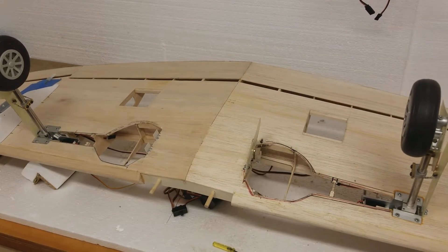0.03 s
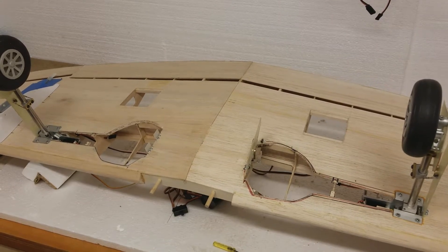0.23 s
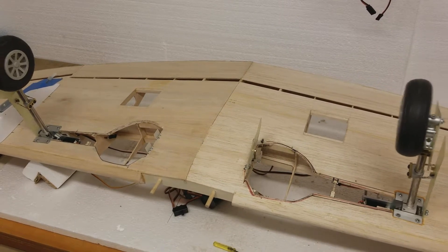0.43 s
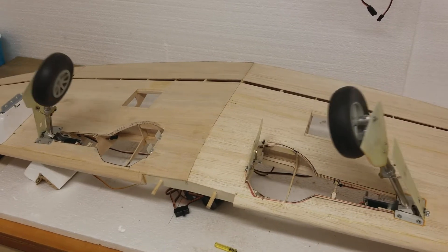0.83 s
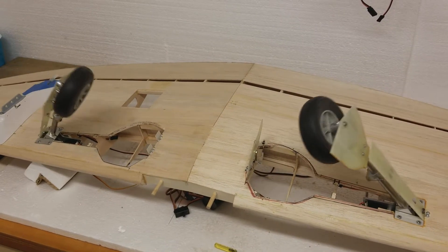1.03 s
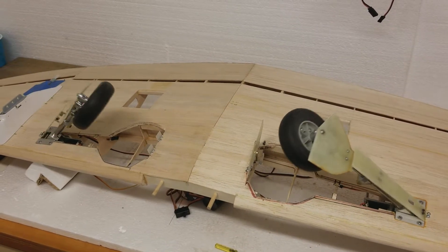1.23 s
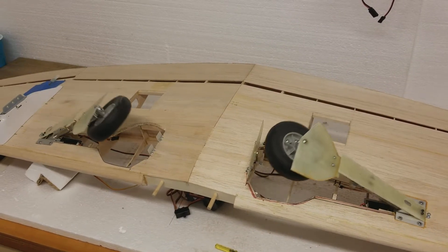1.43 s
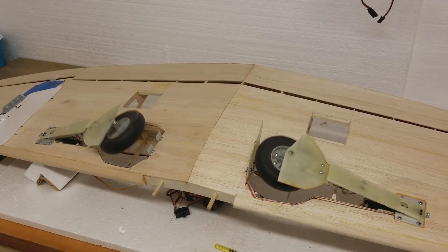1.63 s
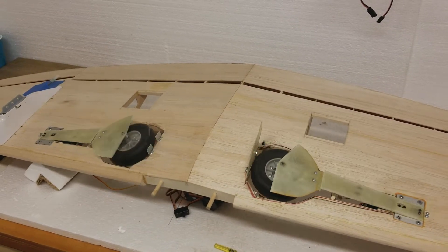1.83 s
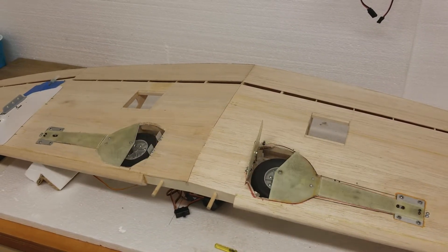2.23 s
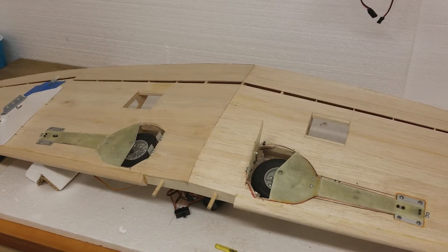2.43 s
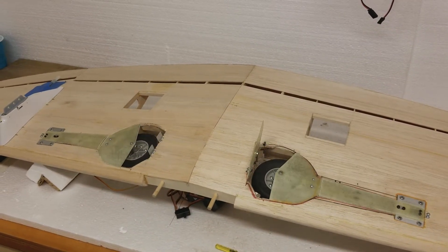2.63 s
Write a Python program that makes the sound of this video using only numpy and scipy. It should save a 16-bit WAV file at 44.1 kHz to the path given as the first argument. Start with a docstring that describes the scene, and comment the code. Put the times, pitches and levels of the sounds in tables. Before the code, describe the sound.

Small electric motors whir and grind, folding model landing gear, then rattle and stop.

```python
"""Two small geared motors fold the landing gear into a balsa model wing on a workbench.
After a click they spin up, with grinding teeth and hissing brushes, and wobble once per turn of their
lead screws (the threaded rods that move the legs). The wing rumbles as the legs tip over. The motors
labour as the wheels seat, rattle free and cut out. The idle electronics whine faintly throughout,
and the room adds a short echo."""
import sys
import numpy as np
from scipy import signal
from scipy.fft import rfft, irfft, next_fast_len
from scipy.io import wavfile

SR = 44100
rng = np.random.default_rng(int(sys.argv[2]) if len(sys.argv) > 2 else 0)


def file_out(sig):
    """Save sig as 16-bit WAV at sys.argv[1]."""
    # one column per channel
    cols = np.atleast_2d(sig).T
    # limit, then scale
    lim = np.clip(cols, -1, 1)
    pcm = np.round(lim * 32767).astype(np.int16)
    wavfile.write(sys.argv[1], SR, pcm)


N = 123479
T = np.arange(N) / SR

# tones of the idle electronics: pitch_multiple, level_db
WHINE_TONES = [(1, -70), (2, -61), (3, -47.5), (4, -58.5), (5, -60), (7, -63), (9, -62), (10, -60),
               (11, -62.5), (19, -69.5)]
# tone colour of the background noise and of the click: frequency_hz, level_db
BACKGROUND_COLOUR = [(25, -5), (100, -5), (300, -17.5), (600, -22), (1500, -13), (3500, -22), (6000, -18.5),
                     (9000, -21.5), (13000, -33)]
CLICK_COLOUR = [(300, -23), (650, -10), (870, 10.5), (1200, -5), (2500, -10.5), (4000, -13), (6000, -16),
                (8500, -28), (12000, -19), (16000, -41)]
# how each motor runs: time_s, speed_hz (turns a second), dip_hz (slowing as the screw binds), level_db
MOTOR_A_RUN = [(.15, 258, 0.5, 2), (.215, 375, -1, -3), (.45, 388, 2.5, 1.5), (.78, 363, 4, -1),
               (1.0, 350, 10, 1.5), (1.2, 332, 20, 1), (1.4, 320, 24, 0), (1.5, 309, 20, 0),
               (1.8, 303, 22.5, 0.5), (1.93, 320, 4.5, -1), (2.0, 330, 4, -3), (2.12, 378, 0.5, -4),
               (2.18, 290, -1.5, 1.5), (2.25, 236, 0, -3), (2.285, 223, -0.5, 0.5), (2.32, 246, -0.5, -2),
               (2.362, 210, 1, -3), (2.38, 245, 0.5, -18), (2.425, 233, 1, -9.5), (2.5, 250, 1, -15)]
MOTOR_B_RUN = [(.15, 262.7, -1.5, -13), (.22, 365.2, 0, 0), (.35, 370.4, 5.5, -0.5), (.45, 385.4, -2, 2),
               (.72, 366.8, 5, -0.5), (.88, 360.6, 18, -2), (.96, 356.9, 12, 2), (1.2, 340.2, 15.5, -4.5),
               (1.32, 339.6, 19.5, -2), (1.82, 338, 17, -4.5), (1.92, 382.9, -1.5, -3),
               (1.97, 382.3, 3.5, -6), (2.035, 344.2, -2, 0), (2.125, 377.1, -0.5, 3),
               (2.18, 335.4, 0, -3.5), (2.21, 265.9, 0, 2), (2.3, 244.4, -3, -3), (2.36, 260, 0, 2.5),
               (2.385, 310, -2, -10.5), (2.49, 347.5, -1, -5)]
# motor tones, A rich in meshing teeth, B mostly the tug of its three magnetic poles:
# speed_multiple, free_level_db, loaded_level_db
MOTOR_A_TONES = [(1, -32.5, -40.5), (3, -25.5, -37.5), (4, -37.5, -45), (5, -35, -49), (6, -28, -27),
                 (7, -32, -45), (8, -42.5, -34), (9, -34.5, -22), (10, -44, -54), (12, -64, -32),
                 (20, -45.5, -50), (33, -44, -52), (42, -58, -39), (60, -62, -45)]
MOTOR_B_TONES = [(1, -29.5, -43.5), (2, -44, -40), (3, -20, -36.5), (5, -32, -44.5), (6, -32.5, -20),
                 (7, -35, -48), (9, -35.5, -28)]
# speeds at which a motor sounds fully loaded and fully free: loaded_hz, free_hz
LOADED_AND_FREE_HZ = [240, 380]
# how well the wing gives off each motor tone: frequency_hz, gain_db
WING_RESPONSE = [(800, -1.5), (960, 3.5), (1040, 5.5), (1100, 0), (1160, -5), (1380, 5), (1510, 4),
                 (1650, 3), (1950, 0), (2090, 3), (2700, 1.5), (3200, 0.5), (4200, -5), (7000, 6.5),
                 (8400, -10), (10000, 2)]
# loudness of the gear teeth and the brushes: time_s, grind_db, hiss_db
SCRAPE_LEVELS = [(.15, -17, -35), (.2, -31, -31.5), (.5, -33, -33.5), (.75, -28, -30), (.9, -30.5, -29.5),
                 (1.3, -27.5, -30.5), (1.8, -24.5, -31), (1.96, -22.5, -32.5), (2.15, -26.5, -31.5),
                 (2.355, -33, -34.5), (2.38, -21, -35), (2.43, -22, -33.5), (2.465, -26, -36),
                 (2.5, -17.5, -29.5)]
# tone colour of the teeth and of the brushes: frequency_hz, level_db
GRIND_COLOUR = [(230, -23), (290, -8), (440, -5), (540, 1.5), (680, -16), (850, 0.5), (1100, 1.5),
                (1500, 5), (2100, 5.5), (3000, -0.5), (4000, -10.5), (6000, -25)]
BRUSH_COLOUR = [(2500, 7.5), (4000, 7.5), (5200, 4.5), (6700, 8), (7500, -4), (8400, -15), (10000, 0.5),
                (12000, 2.5), (13800, -4.5), (15500, 0)]
# loudness of the wing's rumble: time_s, level_db
RUMBLE_LEVELS = [(0, -76), (.7, -72), (.9, -56), (1.2, -57), (1.6, -53), (1.9, -58), (2.0, -41.5),
                 (2.15, -49), (2.22, -76), (2.6, -70)]
# tone colour of the rumble and of a knock's crack: frequency_hz, level_db
RUMBLE_COLOUR = [(20, -10), (45, 0.5), (90, -4), (180, -10.5), (300, 6), (600, -55)]
CRACK_COLOUR = [(300, 0), (850, 10), (1200, 21), (1550, 12), (2200, -29), (4000, -3), (12000, -29)]
# knocks in the gears: start_s, level_db, pitch_hz
GEAR_KNOCKS = [(1.961, -12, 1152), (2.035, -14.5, 1040), (2.372, -15, 1206), (2.387, -14, 1856),
               (2.424, -14.5, 1410), (2.453, -18.5, 1605)]
# how alike a noise is on the left and right: frequency_hz, likeness (0 to 1)
STEREO_LIKENESS = [(100, 0.92), (350, 0.94), (700, 0.94), (2000, 0.91), (5000, 0.23), (15000, 0.75)]
# how much louder the left microphone is than the right: frequency_hz, difference_db
LEFT_OVER_RIGHT = [(100, 1.5), (330, 0), (1100, 1.5), (1800, 4.5), (2800, 2.5), (4200, 0), (6400, -2),
                   (9800, -3), (14000, 3)]


def from_db(db):
    """Turn decibels into a factor to multiply by."""
    return 10 ** (np.asarray(db) / 20)


def unit_power(x):
    """Scale a signal to an average power of 1."""
    return x / np.sqrt(np.mean(x ** 2) + 1e-20)


def over_time(rows):
    """Join a table's time points with straight lines, giving one curve per column."""
    times, *columns = np.transpose(rows)
    return [np.interp(T, times, column) for column in columns]


def at_hz(rows, hz):
    """Look up a table at any frequency, with octaves evenly spaced."""
    frequencies, values = np.transpose(rows)
    return np.interp(np.log(hz + 1e-9), np.log(frequencies), values)


def filtered(x, response):
    """Multiply each frequency f in a sound by response(f)."""
    size = next_fast_len(N + SR // 2)
    f = np.arange(size // 2 + 1) * SR / size
    return irfft(rfft(x, size) * response(f), size)[..., :N]


def drift(rate_hz, step=16):
    """A smooth random wander of about 1 either way, mostly slower than rate_hz."""
    count = next_fast_len(N // step + 2)
    f = np.arange(count // 2 + 1) * SR / step / count
    slow = irfft(rfft(rng.standard_normal(count)) / (1 + (f / rate_hz) ** 2), count)
    return np.interp(np.arange(N) / step, np.arange(count), unit_power(slow))


def noise(colour):
    """Stereo noise with a given tone colour; the two sides are more alike in the bass than the treble."""
    def part(sign):
        return filtered(rng.standard_normal(N),
                        lambda f: from_db(at_hz(colour, f)) * np.sqrt(1 + sign * at_hz(STEREO_LIKENESS, f)))
    shared, opposed = part(1), part(-1)
    return unit_power(np.array([shared + opposed, shared - opposed]))


def placed(x, lead_ms, pan_db):
    """Make a sound reach the left side first; a positive pan_db also makes it louder there."""
    def response(f):
        delay = np.exp(-2j * np.pi * f * lead_ms / 1000)
        return np.array([from_db(pan_db / 2) * np.ones_like(f), from_db(-pan_db / 2) * delay])
    return filtered(x, response)


def hit(start_s, level_db, decay_s):
    """The loudness of one contact: sudden, then dying away."""
    return from_db(level_db) * (T >= start_s) * np.exp(-np.abs(T - start_s) / decay_s)


def electronics_whine(pitch_hz=471):
    """The idle electronics give a steady buzz that wavers a little in pitch and level."""
    hz = pitch_hz * (1 + 0.00198 * drift(13.4))
    angle = 2 * np.pi * np.cumsum(hz) / SR
    return np.sqrt(2) * sum(from_db(db + drift(3.2)) * np.sin(multiple * angle + rng.uniform(0, 2 * np.pi))
                            for multiple, db in WHINE_TONES)


def background(level_db=-57):
    """A faint, even noise lies under everything."""
    return from_db(level_db) * noise(BACKGROUND_COLOUR)


def click():
    """The drive engages with a light tick, a quickly fading burst of noise."""
    return noise(CLICK_COLOUR) * hit(start_s=0.1, level_db=-25.5, decay_s=0.014)


def screw_tightness(tight_s=0.818, turn_hz=18.36, slowing_hz_per_s=2.64):
    """The lead screws bind once per turn as they gradually slow: 1 is tight, -1 is loose."""
    t = T - tight_s
    turns = turn_hz * t - slowing_hz_per_s * t ** 2 / 2
    return np.cos(2 * np.pi * turns)


def motor_spin(run, loss_db_per_hz):
    """A motor's speed, angle and gain; when the binding screw slows it, it also gets quieter."""
    mean_hz, dip_hz, level_db = over_time(run)
    sag_hz = dip_hz * screw_tightness()
    speed_hz = (mean_hz - sag_hz) * (1 + 0.0026 * drift(127))
    angle = 2 * np.pi * np.cumsum(speed_hz) / SR
    return speed_hz, angle, from_db(level_db - loss_db_per_hz * sag_hz)


def motor_power(on_s=0.14, rise_s=0.027, off_s=2.503, fade_s=0.014):
    """The motors' sound comes up quickly, holds, then dies abruptly as they cut out."""
    return np.clip((T - on_s) / rise_s, 0, 1) * np.exp(-np.maximum(T - off_s, 0) / fade_s)


def tooth_play(spread_rad=0.04):
    """Loose gear teeth jiggle the angle, which roughens the highest tones most."""
    return spread_rad * drift(260)


def motor_hum(tones, speed_hz, angle, gain, flutter_db=2.5):
    """Imbalance, magnetic tugs and meshing teeth make tones; load favours 6 and 9 times the speed."""
    hum = np.zeros(N)
    for multiple, free_db, loaded_db in tones:
        pitch_hz = multiple * speed_hz
        db = np.interp(speed_hz, LOADED_AND_FREE_HZ, [loaded_db, free_db])
        db += at_hz(WING_RESPONSE, pitch_hz) + flutter_db * drift(20.4)
        wave = np.sin(multiple * (angle + tooth_play()) + rng.uniform(0, 2 * np.pi))
        hum += from_db(db) * (pitch_hz < SR / 2) * wave  # skip pitches too high for the sample rate
    return np.sqrt(2) * gain * hum


def brush_buzz(angle):
    """Part of the brushes' scrape repeats every turn, making high tones of uneven strength."""
    buzz = np.zeros((2, N))
    for multiple in range(10, 52):
        strength = rng.rayleigh(1, (2, 1))  # different on each side
        buzz += strength * np.sin(multiple * (angle + tooth_play()) + rng.uniform(0, 2 * np.pi, (2, 1)))
    return unit_power(filtered(buzz, lambda f: from_db(at_hz(BRUSH_COLOUR, f))))


def gears_and_brushes(angle, buzz_share=0.65, grit_db=1.4, hiss_dip_db=1.5):
    """Teeth grind and brushes (the motor's sliding contacts) scrape in gritty bursts, three to a turn."""
    grind_db, hiss_db = over_time(SCRAPE_LEVELS)
    pulses = 1 + 0.16 * np.cos(3 * angle)
    bursts = unit_power(pulses * from_db(grit_db * drift(160)))
    scrape = np.sqrt(1 - buzz_share) * noise(BRUSH_COLOUR) + np.sqrt(buzz_share) * brush_buzz(angle)
    brushes = from_db(hiss_db - hiss_dip_db * screw_tightness()) * scrape
    teeth = from_db(grind_db) * noise(GRIND_COLOUR)
    return bursts * (teeth + brushes)


def wing_rumble():
    """The wing rumbles as the legs move."""
    return from_db(over_time(RUMBLE_LEVELS)[0]) * noise(RUMBLE_COLOUR)


def gear_rattle(crack_db=-6.5):
    """The gears knock as the legs seat: each knock is a noisy crack and a ring at its own pitch."""
    cracks, rings = np.zeros(N), np.zeros(N)
    for start_s, level_db, pitch_hz in GEAR_KNOCKS:
        cracks += hit(start_s, level_db + crack_db, decay_s=0.008)
        rings += hit(start_s, level_db, decay_s=0.013) * np.sin(2 * np.pi * pitch_hz * (T - start_s))
    return cracks * noise(CRACK_COLOUR) + placed(rings, lead_ms=0.17, pan_db=3.5)


def echoes(x, fade_s):
    """A blur of reflections, different on each side, that falls by 60 dB in fade_s."""
    t = T[:SR // 2]
    tail = rng.standard_normal((2, len(t))) * from_db(-60 * t / fade_s) * (t > 0.002)
    tail /= np.sqrt(np.sum(tail ** 2, axis=1, keepdims=True))
    return signal.fftconvolve(x, tail, axes=1)[:, :N]


def workshop_echo(x, boom_hz=540, width_hz=78):
    """Bench and wall give short echoes with little bass; a narrow band lingers as a boom."""
    def boom_band(f):
        return (1j * f * width_hz / (boom_hz ** 2 - f ** 2 + 1j * f * width_hz)) ** 2
    near = filtered(echoes(x, fade_s=0.21), lambda f: 1j * f / (1j * f + 350) / (1 + f / 14000))
    boom = filtered(echoes(x, fade_s=0.48), boom_band)
    return from_db(-6) * near + from_db(-8.5) * boom


def scene(bass_cut_hz=266):
    """Both drives in the wing, their echo, the rumble, the whine and the background."""
    speed_a, angle_a, gain_a = motor_spin(MOTOR_A_RUN, loss_db_per_hz=0.044)
    speed_b, angle_b, gain_b = motor_spin(MOTOR_B_RUN, loss_db_per_hz=0.1336)
    motor_a = placed(motor_hum(MOTOR_A_TONES, speed_a, angle_a, gain_a), lead_ms=0.25, pan_db=2)
    motor_b = placed(motor_hum(MOTOR_B_TONES, speed_b, angle_b, gain_b), lead_ms=0.2, pan_db=0)
    scrape = placed(gears_and_brushes(angle_a), lead_ms=0.17, pan_db=0.1)
    drive = motor_power() * (motor_a + motor_b + scrape) + gear_rattle() + click()
    # the wing gives off little of the drives' bass
    drive = signal.sosfilt(signal.butter(6, bass_cut_hz, "high", fs=SR, output="sos"), drive)
    rumble = wing_rumble()
    room = workshop_echo(drive)
    whine = placed(electronics_whine(), lead_ms=0.089, pan_db=-7.5)
    return drive + room + rumble + whine + background()


def record(dry, treble_cut_hz=15800):
    """The two microphones differ in tone colour, and the highest treble is cut."""
    coloured = filtered(dry, lambda f: from_db(np.outer([0.5, -0.5], at_hz(LEFT_OVER_RIGHT, f))))
    return signal.sosfilt(signal.ellip(12, 0.1, 90, treble_cut_hz, fs=SR, output="sos"), coloured)


dry = scene()
out = record(dry)
file_out(out)
```